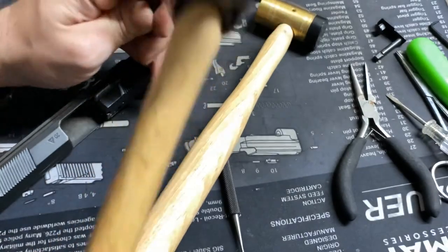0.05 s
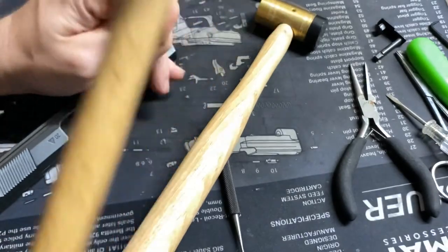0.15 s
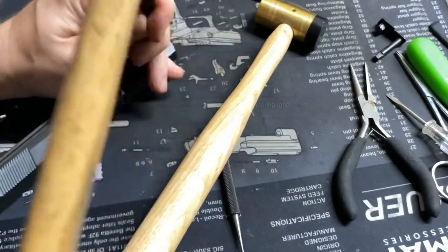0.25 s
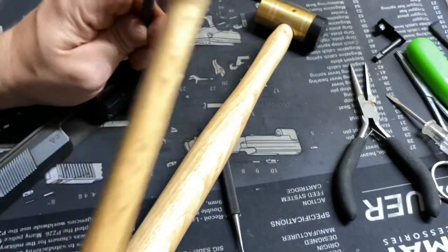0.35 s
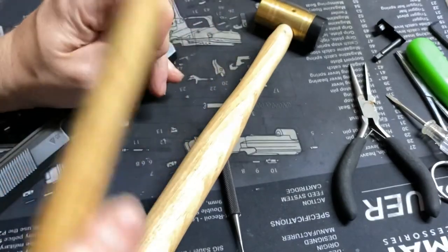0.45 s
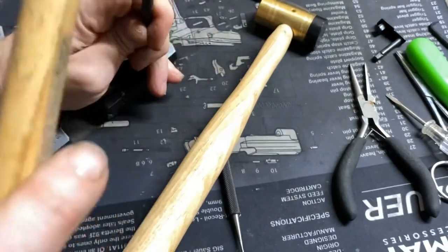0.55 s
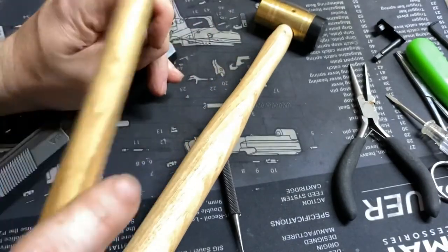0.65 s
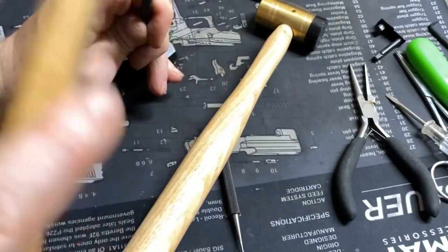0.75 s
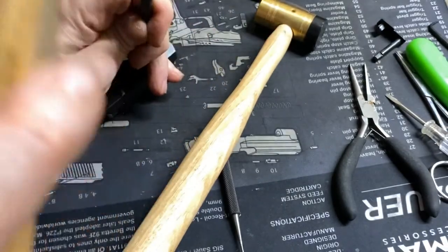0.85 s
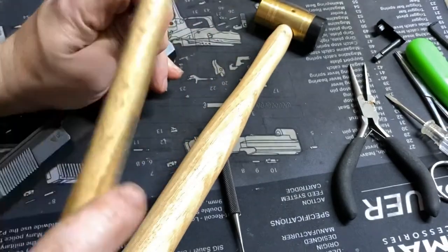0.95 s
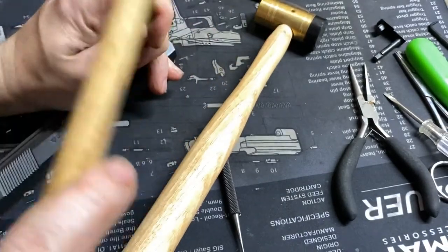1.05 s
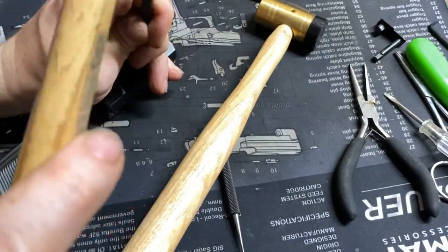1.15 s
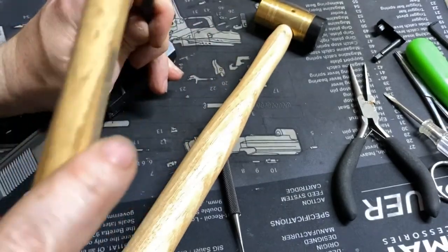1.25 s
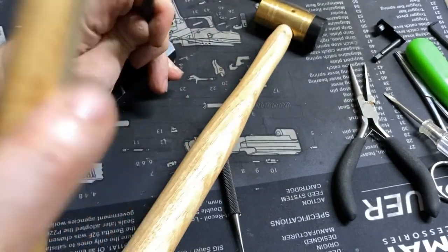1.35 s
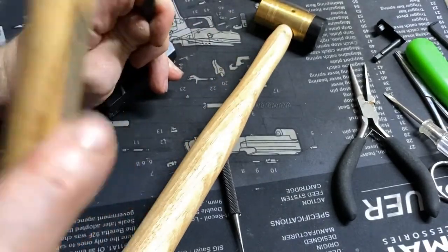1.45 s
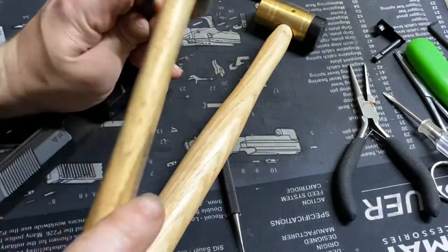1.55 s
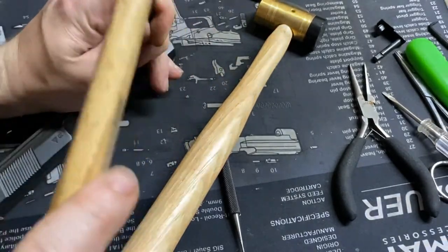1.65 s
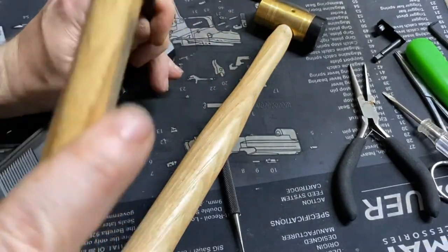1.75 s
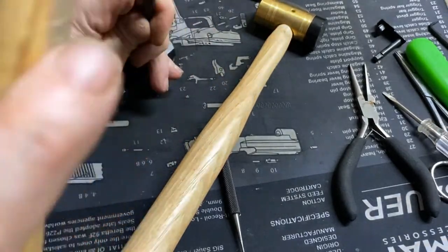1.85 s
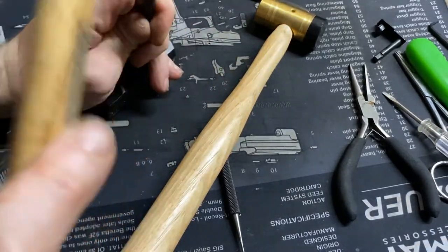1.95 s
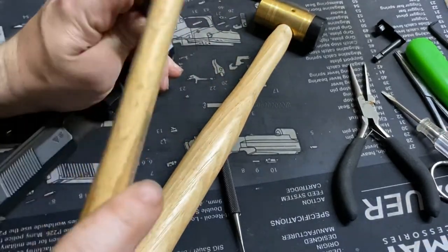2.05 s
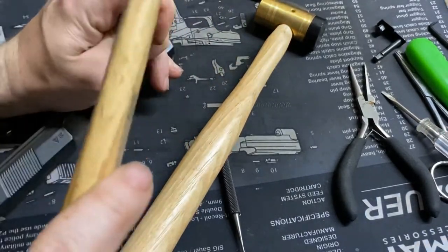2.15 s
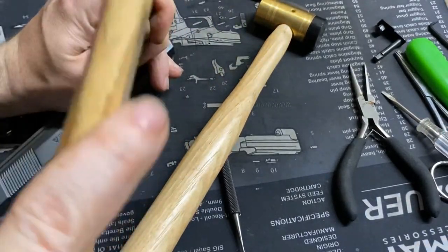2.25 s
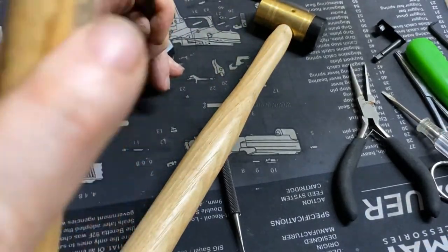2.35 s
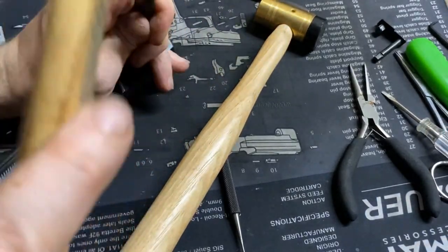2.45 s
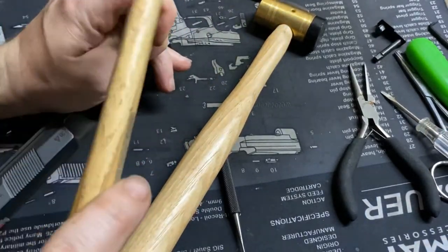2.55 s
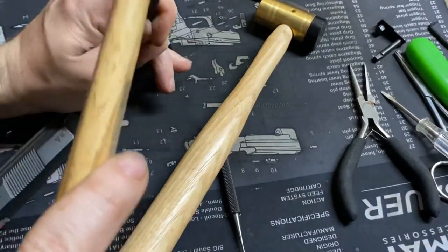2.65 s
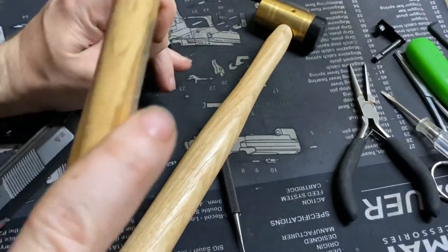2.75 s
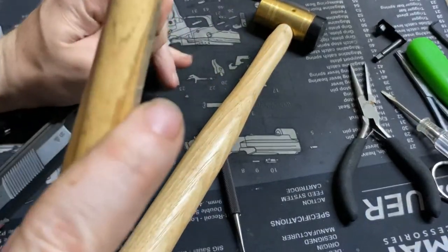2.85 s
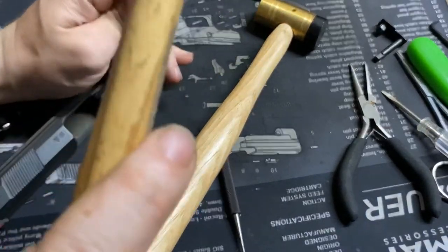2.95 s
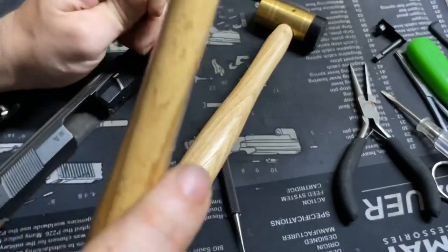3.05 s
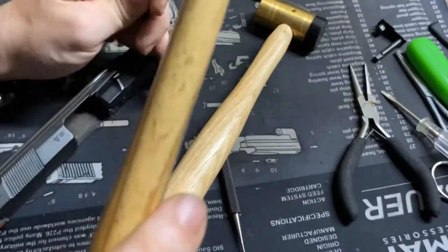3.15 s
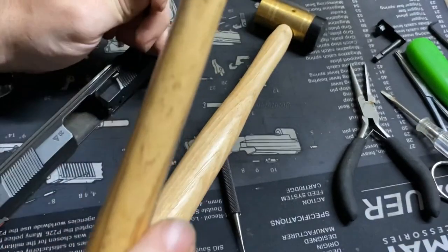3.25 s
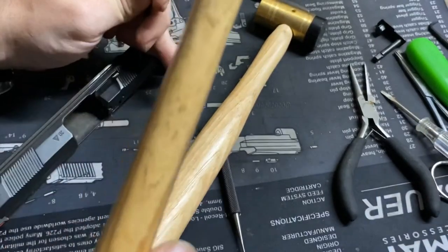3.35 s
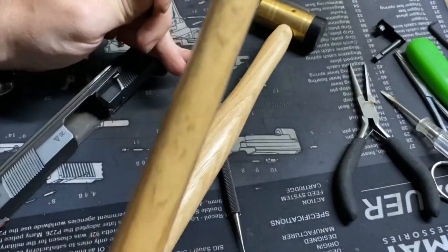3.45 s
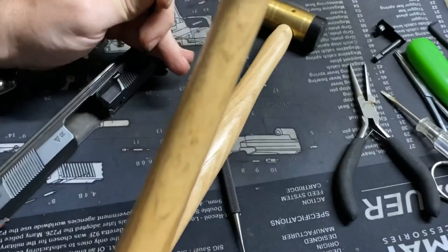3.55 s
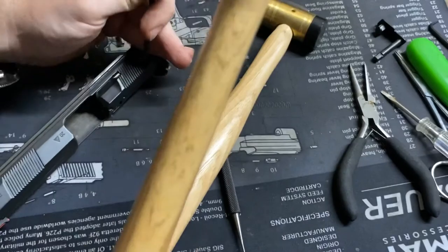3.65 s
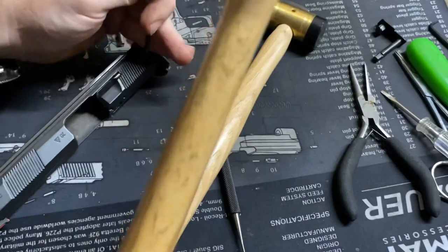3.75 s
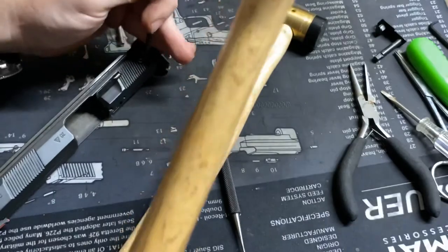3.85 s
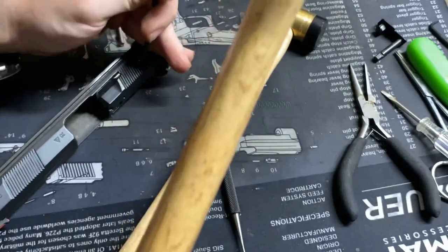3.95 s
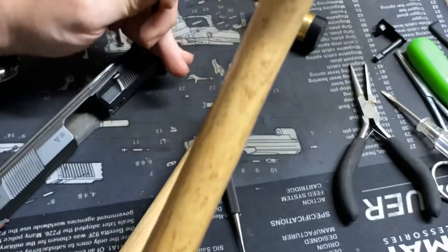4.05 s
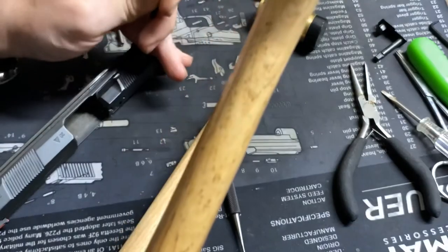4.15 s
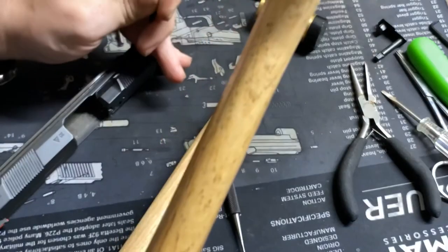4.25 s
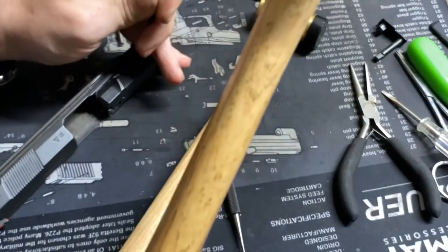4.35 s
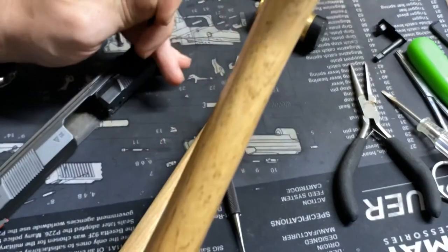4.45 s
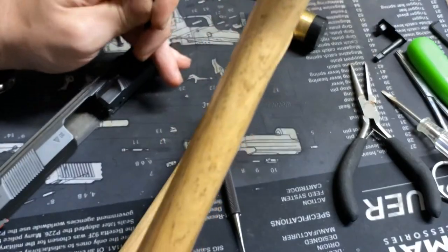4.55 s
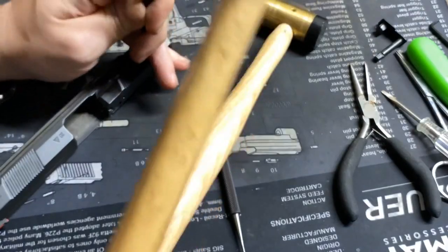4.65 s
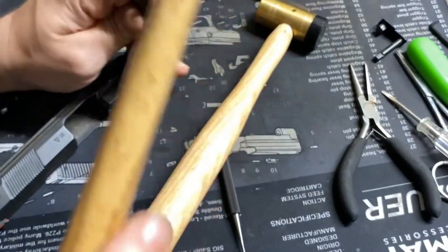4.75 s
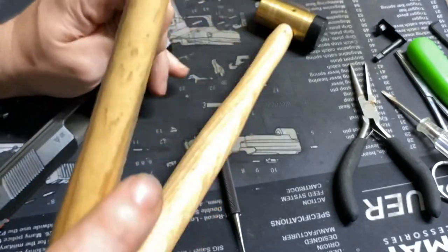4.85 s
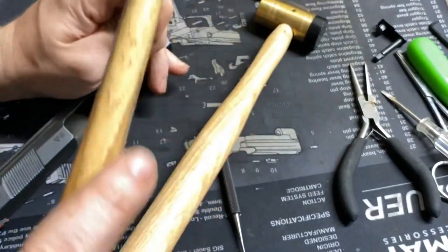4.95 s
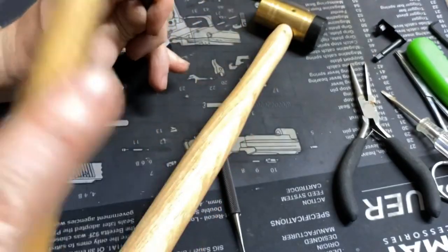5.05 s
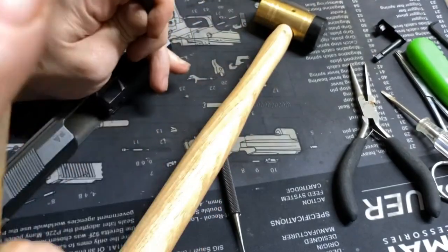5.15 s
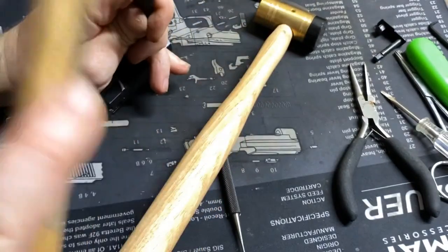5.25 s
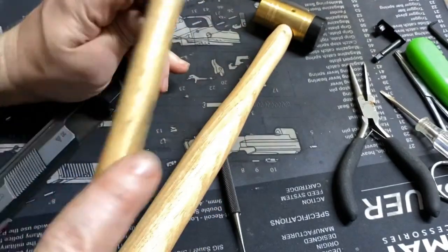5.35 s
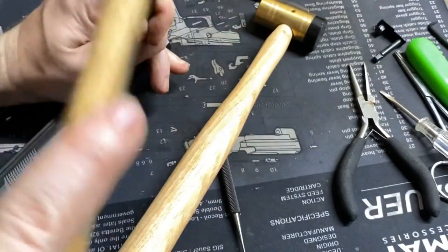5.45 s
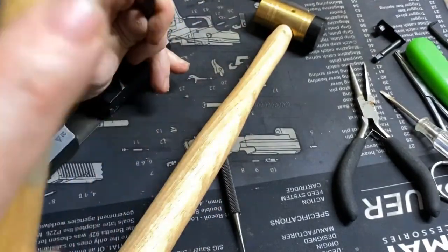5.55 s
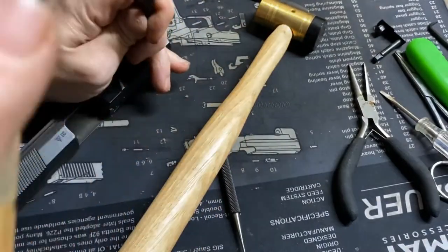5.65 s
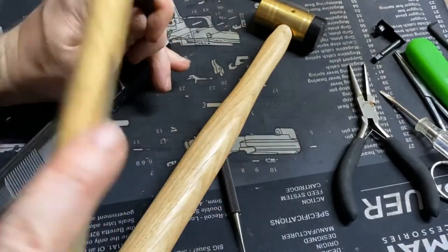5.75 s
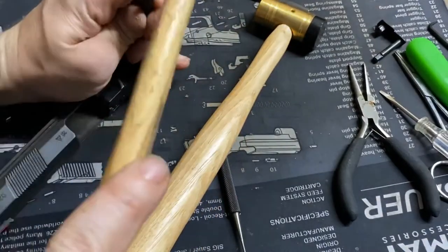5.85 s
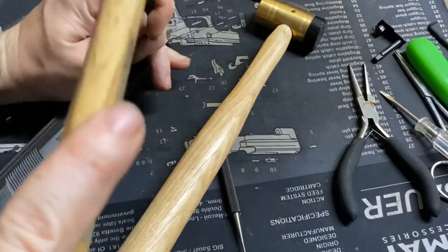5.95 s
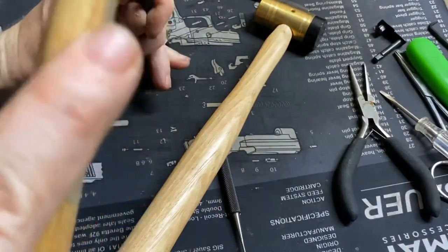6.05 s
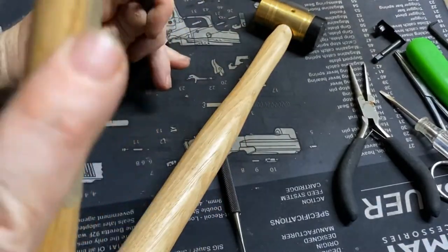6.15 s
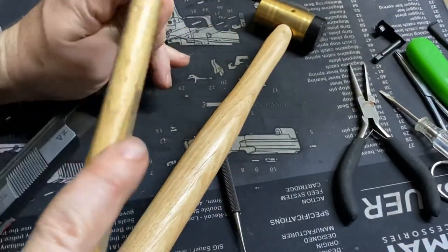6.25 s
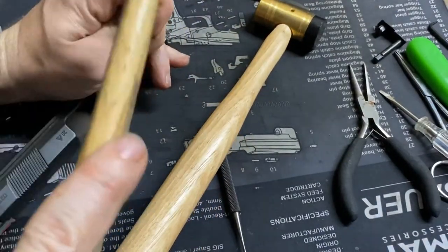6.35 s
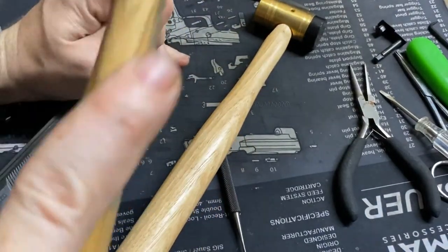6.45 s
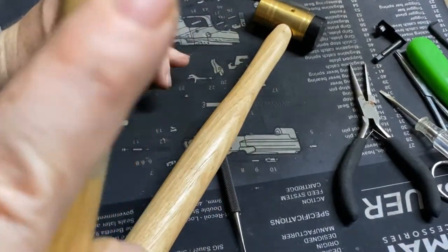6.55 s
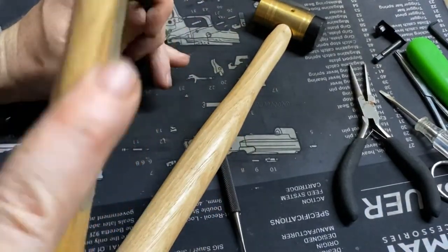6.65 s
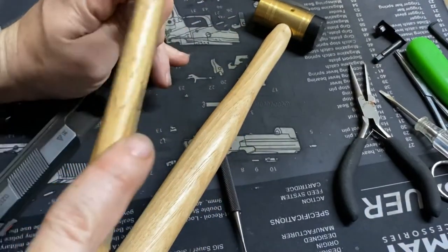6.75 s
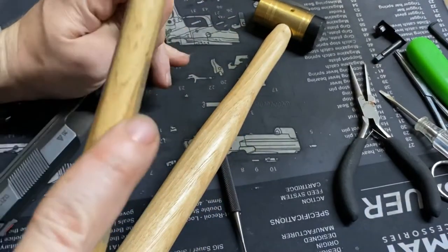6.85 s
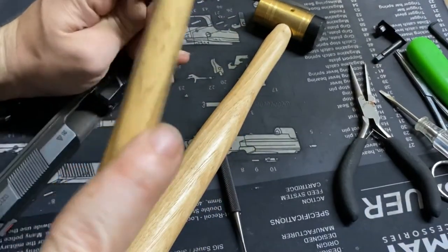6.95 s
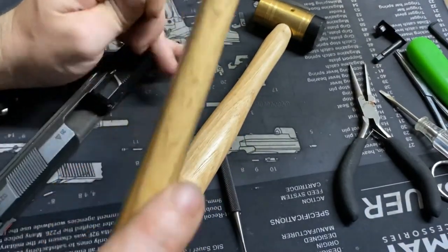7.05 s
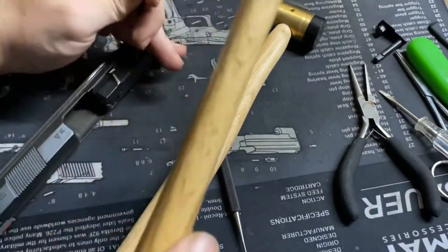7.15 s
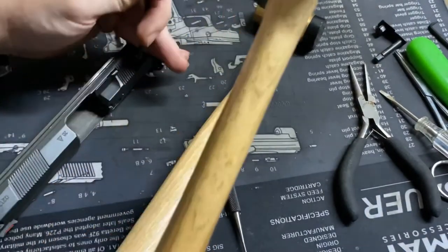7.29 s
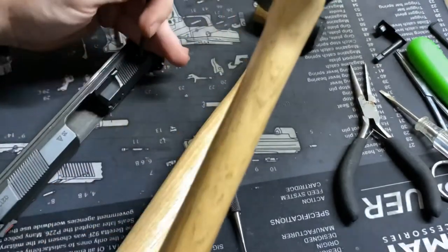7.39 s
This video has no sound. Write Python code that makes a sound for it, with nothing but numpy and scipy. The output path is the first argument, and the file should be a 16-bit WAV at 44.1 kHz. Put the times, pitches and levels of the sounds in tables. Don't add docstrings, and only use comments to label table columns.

```python
import sys
import numpy as np
from scipy import signal
from scipy.io import wavfile

SR = 44100
rng = np.random.default_rng(int(sys.argv[2]) if len(sys.argv) > 2 else 0)


def unload_wav(signal):
    wavfile.write(
        sys.argv[1],
        SR,
        np.round(np.clip(np.atleast_2d(signal).T, -1, 1) * 32767).astype(np.int16),
    )


def gain_from_decibels(decibels):
    exponent = np.asarray(decibels, float) / 20
    return 10 ** exponent


N = 327222

# start in seconds, peak of the crack in dB, bench thump in dB,
# knock of the steel part in dB, bright steel ring in dB.
BLOWS = [
    (0.9816, -10.5, -9.5, -29.5, -16.5),
    (1.5556, -5.5, -7.5, -21.5, -22.5),
    (2.0495, -5, -7.5, -25.5, -20.5),
    (2.5591, -8.5, -6.5, -30, -18),
    (5.3350, -6.5, -8.5, -21.5, -15.5),
    (5.8142, -6, -8, -26.5, -26),
    (6.2736, -4.5, -7.5, -21.5, -28),
    (6.7411, -7.5, -10, -14, -22),
]
# pitch in Hz, level in dB, time to fall 60 dB in seconds.
LANDED_MODES = [(76, -27, .15), (110, -26, .14), (140, -22, .12), (255, -28, .1), (296, -22, .09),
                (375, -29, .08), (450, -31, .08), (550, -33, .08)]
SCATTER_DB = 2.0


def in_time(rows, t=None):
    s, *columns = np.transpose(rows)
    if t is None:
        t = np.arange(N) / SR
    return [np.interp(t, s, column) for column in columns]


def at_hz(rows, hz):
    log_rows = [(np.log(row[0]), *row[1:]) for row in rows]
    return [float(value) for value in in_time(log_rows, np.log(hz))]


def drift(rate):
    knots = rng.standard_normal(int(N / SR * 40) + 2)
    return np.interp(np.arange(N) / SR * np.clip(rate, .1, 39), np.arange(len(knots)), knots)


def lean(db):
    return gain_from_decibels([[db], [-db]])


def lowpass(order, top_hz, x):
    return signal.sosfilt(signal.butter(order, top_hz, fs=SR, output="sos"), x)


def band_filter(order, edges_hz, x, kind="band"):
    return signal.sosfilt(signal.butter(order, edges_hz, kind, fs=SR, output="sos"), x)


def bands(low_hz, high_hz, size):
    white = rng.standard_normal((2, 2, size))
    edges = low_hz * 2 ** np.arange(0, np.log2(high_hz / low_hz) + .01, 1 / 2)
    for k, (low, high) in enumerate(zip(edges, edges[1:])):
        band = band_filter(2, [low, high], white[k % 2])
        yield np.sqrt(low * high), band * np.sqrt(SR / 2 / (high - low))


def stereo(pair, alike):
    alike = np.clip(alike, -1, 1)
    mid = np.sqrt(1 + alike) * pair[0]
    side = np.sqrt(1 - alike) * pair[1] * [[1], [-1]]
    return (mid + side) / np.sqrt(2)


def coloured(spectrum, low_hz, high_hz, patchy_db):
    # pitch in Hz, left-right likeness from -1 to 1.
    likeness = [(60, 0.99), (240, 0.88), (950, -0.46), (3770, 0.57), (15000, -0.03)]
    out = 0
    for hz, pair in bands(low_hz, high_hz, size=N):
        gain = gain_from_decibels(at_hz(spectrum, hz)[0] + patchy_db * drift(2.9)) * np.sqrt(hz)
        out = out + gain * stereo(pair, at_hz(likeness, hz)[0])
    return out / np.sqrt(np.mean(out ** 2))


def rings(modes, t, spread_db, rise_s, lag_s=0, wide=0):
    hz, db, t60 = np.transpose(modes)[:, :, None]
    since = np.maximum(t - lag_s, 0)
    level_db = db + spread_db * rng.standard_normal(hz.shape) - 60 * since / t60
    shape = gain_from_decibels(level_db) * (1 - np.exp(-since / rise_s))
    skew = wide * (1 + hz / 4000)
    return np.array([np.sum(shape * np.sin(2 * np.pi * hz * since + side * skew), axis=0) for side in (1, -1)])


def add(out, s, sound):
    i = round(s * SR)
    out[:, i:i + sound.shape[1]] += sound[:, :N - i]


def room_air():
    # time in seconds, level in dB.
    air_level = [(0, -58), (.76, -62.5), (2.85, -63.5), (4.6, -60.5), (7.42, -64.5)]
    # pitch in Hz, level in dB per Hz.
    air_colour = [(119, -18), (238, -6.5), (336, -10.5), (476, -13.5), (673, -17), (951, -19.5),
                  (1345, -26.5), (3800, -61)]
    return gain_from_decibels(in_time(air_level)[0]) * lowpass(2, 2900, coloured(air_colour, 100, 4600, patchy_db=1.2))


def rumble():
    # pitch in Hz, level in dB per Hz.
    rumble_colour = [(12, -39), (20, -14.5), (32, -6.5), (54, 7), (97, -27), (110, -25), (140, -55),
                     (240, -120)]
    return gain_from_decibels(-54.5) * coloured(rumble_colour, 27, 110, patchy_db=1.2)


def load(column):
    # start in seconds, end in seconds, hum in dB, whine in dB.
    spells = [
        (-.2, 0.757, -5.5, -4.5),
        (2.812, 5.0, 1, -4.5),
        (4.354, 4.95, -9, 2),
        (5.655, 5.9, 3.5, 8),
    ]
    idle_db, ramp_s = -10, 0.16
    t = np.arange(N) / SR
    gains = [gain_from_decibels(idle_db)]
    for row in spells:
        ramp = np.minimum(t - row[0], row[1] - t) / ramp_s + .5
        gains.append(gain_from_decibels(row[column]) * np.clip(ramp, 0, 1))
    return np.maximum(gains[0], np.max(gains[1:], axis=0))


def motors():
    # pitch in Hz, rms level in dB.
    motor_lines = [(301, -71), (409, -74), (474, -75), (592, -69), (612, -70), (650, -72), (713, -84),
                   (813, -80), (947, -88), (1211, -81), (1421, -96)]
    hum, whine = load(column=2), load(column=3)
    t, sides = np.arange(N) / SR, np.array([[.6], [-.6]])
    out = 0
    for hz, db in motor_lines:
        level = np.sqrt(2) * (hum if hz < 1000 else whine) * gain_from_decibels(db + 3.2 * drift(3.6))
        out = out + level * np.sin(2 * np.pi * hz * t + sides + drift(4.3))
    return out


def swell(peak_s, rise_s, fall_s):
    edge_db = -24.5
    t = np.arange(N) / SR - peak_s
    return edge_db * (t / np.where(t < 0, rise_s, fall_s)) ** 2


def rustle():
    # time of the peak in seconds, peak in dB, rise in seconds, fall in seconds, top pitch in Hz.
    moves = [
        (.17, -68.5, 0.42, 0.42, 12000),
        (.685, -84, .015, .04, 5000),
        (2.47, -89.5, 0.043, 0.083, 12250),
        (5.04, -78, 0.31, 0.21, 4200),
    ]
    # pitch in Hz, level in dB per Hz.
    cloth_colour = [(1260, -10.5), (1780, 0.5), (2520, -5.5), (3560, -9), (5000, -11.5), (8740, -24.5),
                    (11100, -14), (13000, -30)]
    cloth = coloured(cloth_colour, 1060, 13000, patchy_db=0.0)
    out = 0
    for s, db, rise_s, fall_s, top_hz in moves:
        out = out + gain_from_decibels(db + swell(s, rise_s, fall_s)) * lowpass(4, top_hz, cloth)
    return out


def background():
    hiss = gain_from_decibels(-100) * rng.standard_normal((2, N))
    return (room_air() + hiss + rumble() + motors() + rustle()) * lean(.9)


def ticks():
    # start in seconds, peak in dB, pitch in Hz, lean to the left in dB.
    touches = [(0.03, -72, 2630, 5), (0.12, -54, 6460, 14), (0.1987, -48.5, 2690, 4),
               (0.243, -52, 2700, 3.5), (0.3016, -52, 2680, 3.0), (0.5344, -67, 3150, 1.5),
               (0.5594, -66, 2580, 4), (2.487, -58, 11400, -7), (3.134, -67, 4190, 16),
               (3.144, -43.5, 5130, 2.5), (3.4803, -47, 4940, 3), (3.5402, -50, 4800, 4),
               (4.8544, -78, 3440, 11), (7.118, -43, 4960, 1.5), (7.1807, -58.5, 10520, 4.5)]
    out, t = np.zeros((2, N)), np.arange(int(.15 * SR)) / SR
    body_hz = [1500, 11500]
    for s, db, hz, pan_db in touches:
        click = gain_from_decibels(-9.5 - 60 * t / 0.011) * band_filter(2, body_hz, rng.standard_normal(len(t)))
        fuzz = gain_from_decibels(-18.5 - 60 * t / 0.13) * band_filter(2, body_hz, rng.standard_normal((2, len(t))))
        partner_hz = 2 * hz if hz < 7000 else hz / 2
        ring = rings([(hz, -3, .008), (partner_hz, -10, .008)], t, SCATTER_DB, rise_s=.0003)
        punch = [(f, 0, .08) for f in (2620, 4303, 6288, 7300, 7700)]
        ring += gain_from_decibels(-29) * rings(punch, t, 2 * SCATTER_DB, rise_s=.0005)
        add(out, s, gain_from_decibels(db) * (click + fuzz + ring) * lean(pan_db / 2))
    return out


def settling():
    # start in seconds, peak in dB.
    bumps = [
        (1.198, -29),
    ]
    out, t = np.zeros((2, N)), np.arange(int(.6 * SR)) / SR
    for s, db in bumps:
        noise = band_filter(3, [200, 900], rng.standard_normal(len(t)))
        bump = gain_from_decibels(db + 8 - 60 * t / 0.08) * (1 - np.exp(-t / 0.0049)) * noise
        add(out, s, bump * lean(1.))
        woken = rings(LANDED_MODES[3:], t, SCATTER_DB, rise_s=0.0077, lag_s=0.0046)
        add(out, s, gain_from_decibels(db + 21.5 - 60 * t / 0.19) * woken)
    return out


def aftersound(t, lift_db):
    # pitch in Hz, level in dB, time to fall 60 dB in seconds.
    rattle = [(80, -29, 0.17), (196, -35, .12), (366, -29, 0.079), (790, -27.5, .15), (2890, -43, .28),
              (5950, -42.5, 0.053), (9900, -39, 0.095), (14000, -44, 0.054)]
    # pitch in Hz, level in dB, time to fall 60 dB in seconds, left-right likeness.
    tail = [(80, -53.5, 0.94, 1), (184, -38, .42, 0.42), (360, -26.5, 0.43, 0.18), (794, -34.5, .48, 0.),
            (1700, -41.5, .58, 0.75), (3115, -51.5, 0.61, .4), (10300, -50, 0.42, 0.4),
            (14000, -64.5, .44, .2)]
    shelf_hz, shelf_width_hz, shelf_db = 1556, 440, -6
    out = 0
    for hz, pair in bands(65, 16900, size=len(t)):
        rattle_db, rattle_t60 = at_hz(rattle, hz)
        tail_db, tail_t60, alike = at_hz(tail, hz)
        build = 1 - np.exp(-(t / (0.0054 + 2.4 / hz)) ** 2)
        decay = gain_from_decibels(rattle_db - 60 * t / rattle_t60) + gain_from_decibels(tail_db - 60 * t / tail_t60)
        out = out + build * stereo(pair, alike) * decay
    resonance = signal.lfilter(*signal.iirpeak(shelf_hz, shelf_hz / shelf_width_hz, fs=SR), out)
    return out + gain_from_decibels(shelf_db + lift_db) * resonance


def echoes(steel, t):
    walls = gain_from_decibels(-49.5 - 60 * t / 0.44) * (t > .004) * rng.standard_normal((2, len(t)))
    return signal.fftconvolve(steel, walls, axes=1)[:, :len(t)]


def deaden(x):
    # lower edge in Hz, upper edge in Hz.
    dead_bands = [(8150, 8900), (12900, 14250)]
    upper = band_filter(6, dead_bands[1], x, "stop")
    upper = lowpass(10, 15550, upper)
    return band_filter(1, dead_bands[0], upper, "stop")


def room_tail(steel, t, knock_db):
    lift_db = .3 * (knock_db + 23)
    gate = gain_from_decibels(-(t / 0.29) ** 4)
    return gate * deaden(aftersound(t, lift_db) + echoes(steel, t)) * lean(.9)


def bench(t):
    # pitch in Hz, level in dB, time to fall 60 dB in seconds.
    floating_modes = [(81, -15.5, .14), (134, -12, .11), (200, -36, .11), (247, -15, .1), (283, -4.5, .09),
                      (385, -11, .06), (471, -21, .1), (592, -21, .06), (652, -27, .08)]
    land_s, scatter_db = .0225, .7
    thin_hz, thin_width_hz = 208, 38
    hz = np.array(floating_modes)[:, :1]
    lag = .00293 * (296 / hz) ** 1.27 - .0003
    stopped = gain_from_decibels(-22 / (1 + np.exp(-(t - land_s) / .0006)))
    floating = stopped * rings(floating_modes, t, scatter_db, rise_s=.36 / hz, lag_s=lag, wide=.2)
    floating = signal.lfilter(*signal.iirnotch(thin_hz, thin_hz / thin_width_hz, fs=SR), floating)
    landed = rings(LANDED_MODES, t, 3 * scatter_db, rise_s=0.019, lag_s=land_s, wide=0.078)
    return (floating + landed) * lean(1.1)


def part_knock(t, crack_db, knock_db):
    # pitch in Hz, level in dB, time to fall 60 dB in seconds.
    knock_modes = [(957, -9.5, 0.046), (1000.7, 2.5, 0.024), (1151, 2, 0.066), (1448, -6, 0.073),
                   (1557, 4.5, 0.016), (1680, -5.5, 0.02), (2000, -16, 0.01), (2700, -1, 0.011)]
    modes = []
    for hz, db, t60 in knock_modes:
        drive_db = knock_db if 1100 < hz < 1200 else crack_db - 16.5
        modes.append((hz, db + drive_db, t60))
    return gain_from_decibels(1.5) * rings(modes, t, SCATTER_DB, rise_s=0.00074, lag_s=0.0014, wide=0.28) * lean(1.2)


def punch_song(s, t):
    # pitch in Hz, level in dB, time to fall 60 dB in seconds.
    sing_modes = [(4300, 14, .07), (4303, -2, .75), (4308.5, -6, .6), (6288, -16, .4), (7300, -14, .3),
                  (7700, -10, .35)]
    # time in seconds, level of the song in dB.
    freedom = [(5.4, -65), (5.8, -56), (6.3, -57), (6.74, -48)]
    grip_s = .35
    level_db = in_time(freedom, s)[0] - 60 * np.maximum(t - grip_s, 0) / 0.027
    return gain_from_decibels(level_db) * rings(sing_modes, t, SCATTER_DB, rise_s=.002, wide=0.36)


def steel_ring(t, crack_db, high_db):
    # pitch in Hz, level in dB, time to fall 60 dB in seconds.
    steel_modes = [(4700, -5, .01), (7000, 0, .014), (7310, -8, .05), (7690, -9, .05), (9600, -6, .014),
                   (10080, -14, .05), (10600, -11, .03), (11200, 1, .014), (12300, -6, .016),
                   (14300, -13, .015), (15430, -13, .045), (15560, -15, .035)]
    modes = []
    for hz, db, t60 in steel_modes:
        if hz < 8500:
            drive_db = crack_db - 17.5
        elif hz < 14000:
            drive_db = high_db
        else:
            drive_db = crack_db - 7
        modes.append((hz, db + drive_db, t60))
    return gain_from_decibels(4.5) * rings(modes, t, SCATTER_DB, rise_s=0.000067, wide=.22)


def crack(t, crack_db):
    white = rng.standard_normal(len(t)) + 0.12 * rng.standard_normal((2, len(t)))
    bright = signal.lfilter([1, -1], [1, -.5], white)
    return gain_from_decibels(crack_db - 11.5 - 60 * t / 0.0083) * bright * lean(1.9)


def lead_in(blow):
    t = np.arange(int(.014 * SR)) / SR
    dull = signal.lfilter([1, -.9], [1], lowpass(2, 2800, blow[:, :300 + len(t)]))
    dull = dull[:, 60:60 + len(t)]
    fade = np.cos(np.pi / 2 * t / t[-1])
    return (gain_from_decibels(-7 - 60 * t / .045) * fade * dull)[:, ::-1]


def hammer_blows():
    out, t = np.zeros((2, N)), np.arange(int(.6 * SR)) / SR
    for s, crack_db, bench_db, knock_db, high_db in BLOWS:
        steel = steel_ring(t, crack_db, high_db)
        sound = steel * lean(.6) + crack(t, crack_db)
        sound += part_knock(t, crack_db, knock_db) + punch_song(s, t)
        sound += gain_from_decibels(bench_db + 9.0) * bench(t)
        sound += room_tail(steel, t, knock_db)
        add(out, s, sound)
        add(out, s - .014, lead_in(sound))
    return out


def scene():
    return background() + ticks() + settling() + hammer_blows()


def roll_off(x):
    return signal.sosfilt(signal.butter(12, 17140, fs=SR, output="sos"), x)


def record(dry):
    pump_db, pump_period_s, pump_settle_s = 2.5, 0.21, 0.35
    t, starts = np.arange(N) / SR, np.array(BLOWS)[:, 0]
    since = t - np.r_[-9, starts][np.searchsorted(starts, t)]
    swing = np.exp(-since / pump_settle_s) * np.cos(2 * np.pi * since / pump_period_s)
    x = 0.55 * np.tanh(dry * gain_from_decibels(pump_db * swing) / 0.67)
    x = signal.sosfilt(signal.cheby2(12, 60, 17100, fs=SR, output="sos"), x)
    return roll_off(x)


dry = scene()
out = record(dry)
unload_wav(out)
```